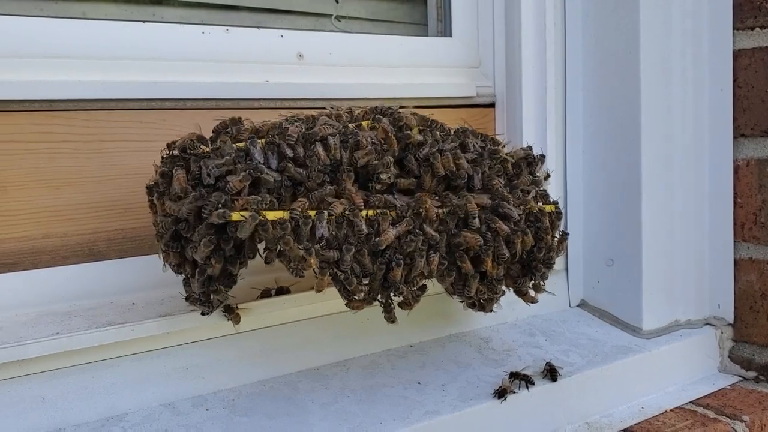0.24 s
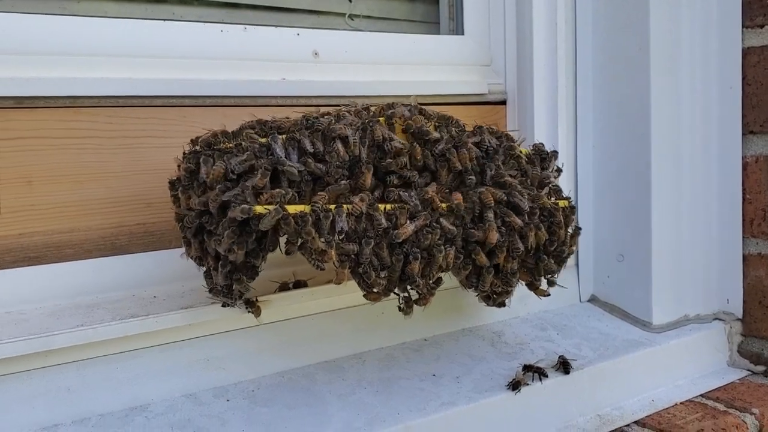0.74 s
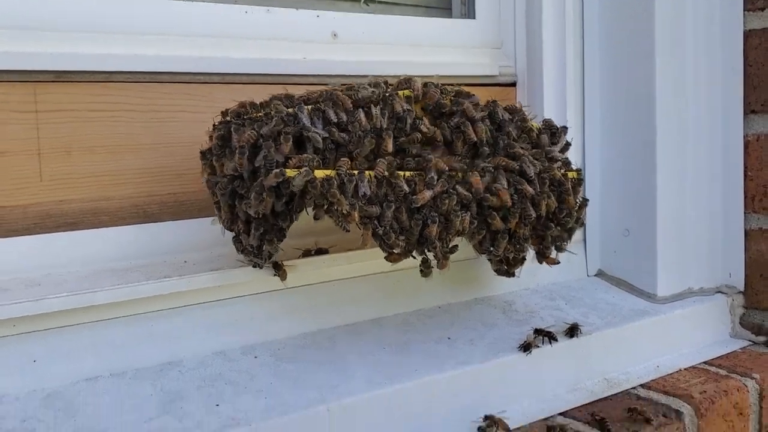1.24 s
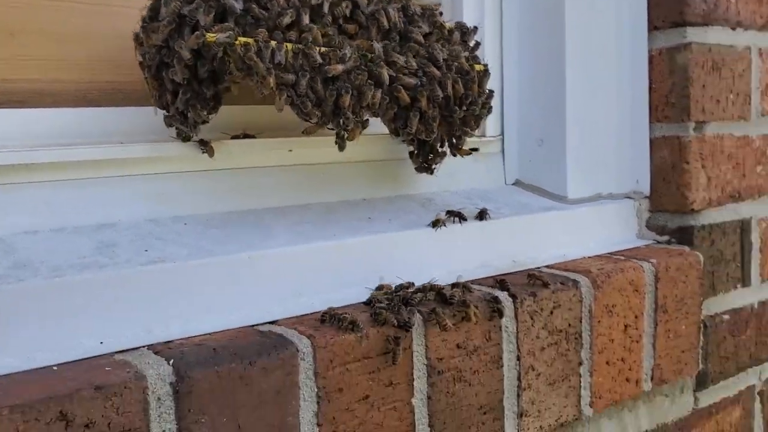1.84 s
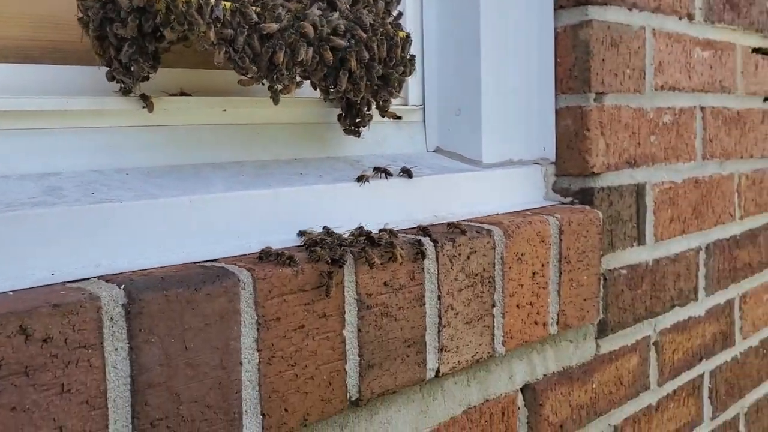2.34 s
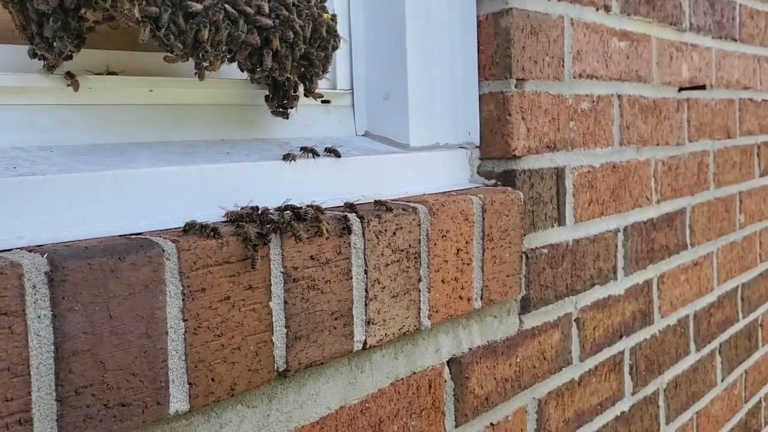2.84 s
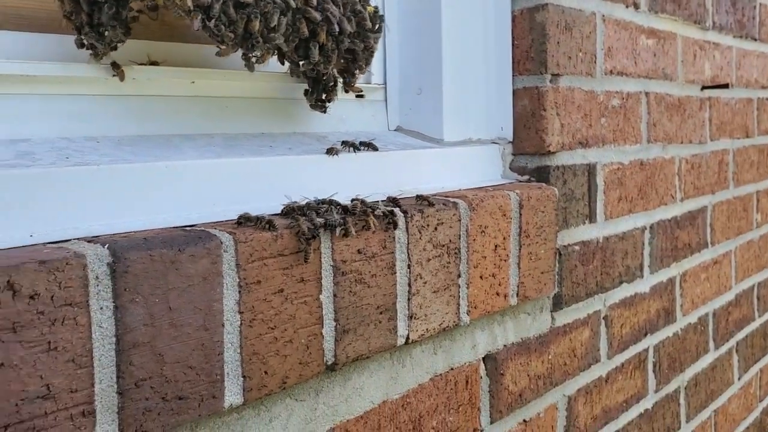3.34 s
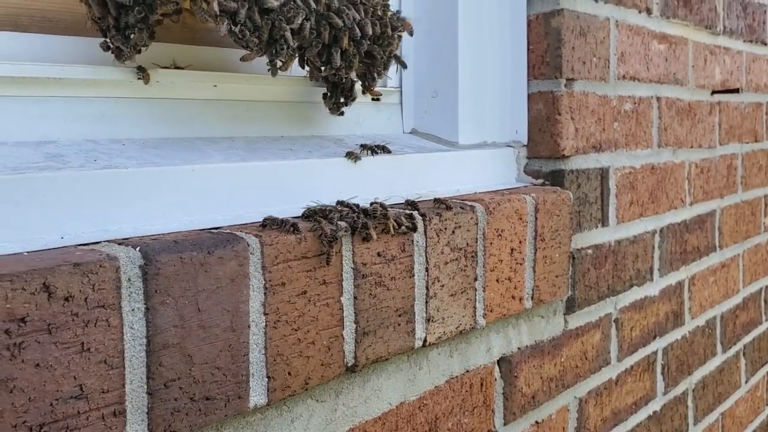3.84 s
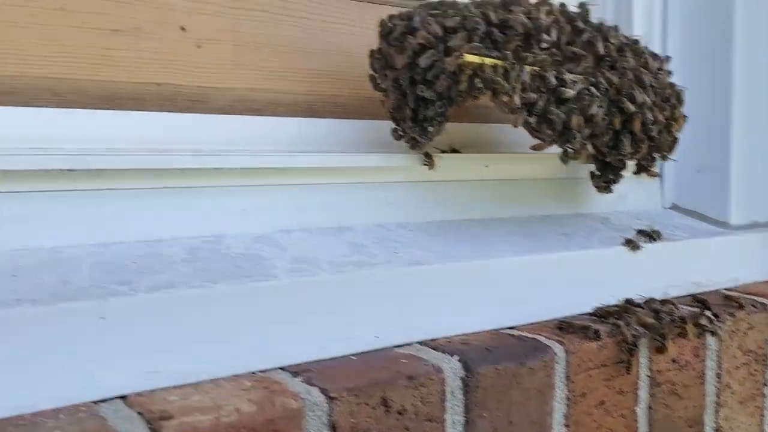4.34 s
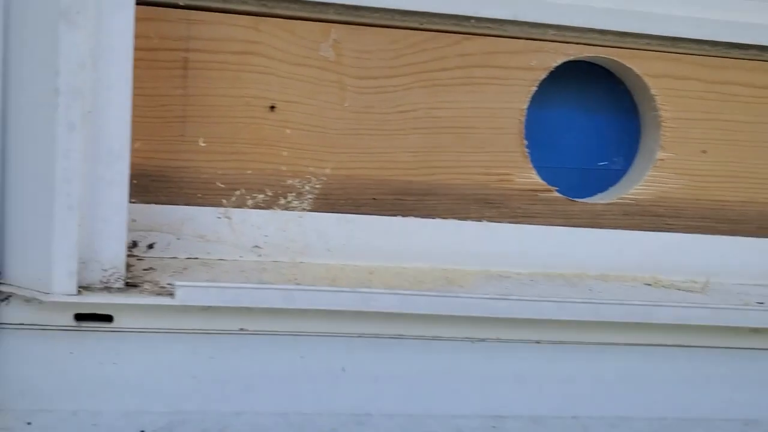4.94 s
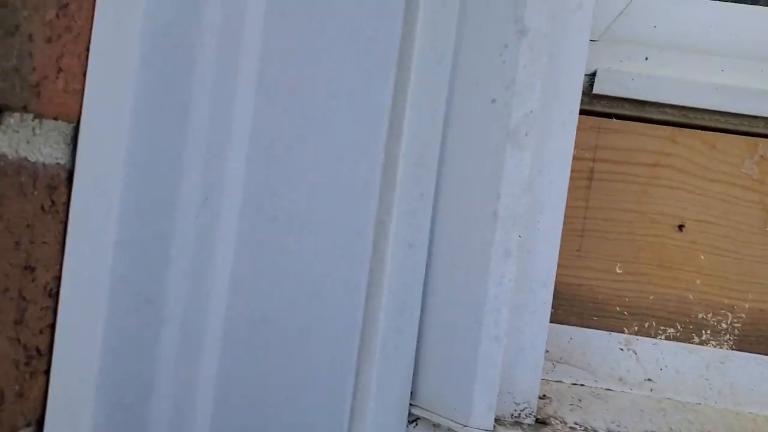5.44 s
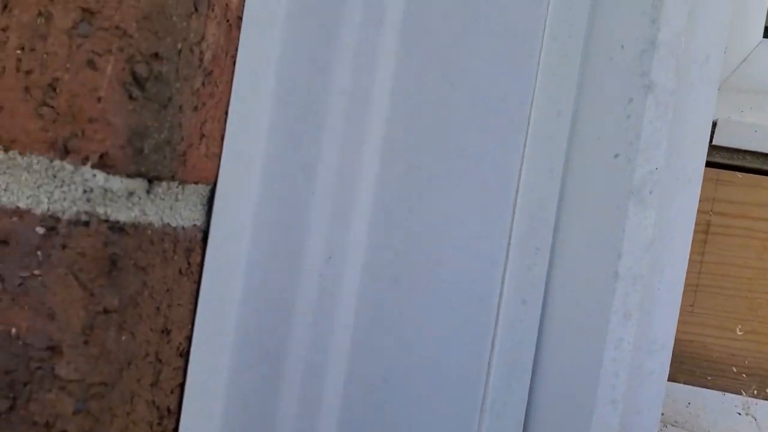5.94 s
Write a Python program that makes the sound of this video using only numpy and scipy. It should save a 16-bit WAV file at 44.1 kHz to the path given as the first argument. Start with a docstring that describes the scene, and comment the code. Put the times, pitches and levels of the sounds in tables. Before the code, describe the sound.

A stereo handheld microphone near a brick house picks up a steady, grainy honeybee hum with wavering overtones. Beneath it, deep far-off machinery beats and rumbles, strongest at first, then dying down. Faint rustles, thin whines and near fly-bys come and go. Later something small is tapped on the left, and near the end shifting feet make one hollow, resonant knock followed by soft scraping.

```python
"""Honeybees at a hive entrance

Honeybees crowd and buzz, as sums of wing-beat harmonics, at a hive on the window of a brick house.
Distant motors hum below as beating sines and exhaust noise; filtered noise makes the outdoor air.
Single bees pass as harmonic clusters, a small bird gives one thin call, and a light tap rings modes.
Towards the end someone shifts their feet: scuffs and one hollow knock ring the ground, and the wall
echoes them."""
import sys
import numpy as np
from scipy import signal
from scipy.fft import rfft, irfft
from scipy.io import wavfile

SR = 44100
rng = np.random.default_rng(int(sys.argv[2]) if len(sys.argv) > 2 else 0)


def wav_record(signal):
    """Record a signal, one row per channel, as 16-bit PCM in the file named by sys.argv[1]."""
    frames = np.transpose(np.atleast_2d(signal))
    bounded = np.clip(frames, -1, 1)
    # unit amplitude maps onto the largest positive 16-bit level
    quanta = np.round(bounded * 32767).astype(np.int16)
    wavfile.write(sys.argv[1], SR, quanta)


N = 272097
TIME = np.arange(N) / SR
HZ = np.maximum(np.arange(N // 2 + 1) * SR / N, 1)


def from_db(db):
    """Decibel law: 20 dB is a factor of ten in amplitude."""
    return 10 ** (np.asarray(db) / 20)


def rms_one(x):
    """Normalisation to unit root mean square."""
    return x / np.sqrt(np.mean(x ** 2) + 1e-20)


def in_time(rows):
    """Linear interpolation of a table's columns at every sample."""
    s, *columns = np.transpose(rows)
    return [np.interp(TIME, s, column) for column in columns]


def on_log_axis(points, at):
    """Interpolation of a two-column table along a logarithmic axis."""
    where, value = np.transpose(points)
    return np.interp(np.log(at), np.log(where), value)


def pan(db):
    """Interaural level difference: left and right gains, positive to the left."""
    return from_db(np.array([[.5], [-.5]]) * db)


def drift(rate):
    """Band-limited random modulation: spread about 1, a new random value rate times a second."""
    knots = rng.standard_normal(N // 8)
    return np.interp(TIME * rate + 1, np.arange(len(knots)), knots) / np.sqrt(2 / 3)


def swell(s, rise, decay):
    """Transient envelope: a Gaussian rise to 1 at time s, then exponential decay."""
    exponent = np.where(TIME < s, ((TIME - s) / rise) ** 2, (TIME - s) / decay)
    return np.exp(-np.minimum(exponent, 50))


def bell(s, length):
    """Gaussian envelope of height 1 around time s."""
    return np.exp(-np.minimum((2 * (TIME - s) / length) ** 2, 50))


def hold_then_fade(hold_s, fade_s):
    """Exponential decay that starts after a steady hold."""
    return np.exp(-np.maximum(TIME - hold_s, 0) / fade_s)


def tone(hz):
    """Phase integration: a sine of rms 1 that follows a pitch curve."""
    return np.sqrt(2) * np.sin(2 * np.pi * (np.cumsum(hz) / SR + rng.random()))


def soften(x, cut_hz):
    """First-order low-pass filtering."""
    return signal.sosfilt(signal.butter(1, min(cut_hz, SR / 2.2), fs=SR, output="sos"), x + 1e-18)


def resonate(x, hz, width_hz):
    """Second-order resonance with a peak gain near 1."""
    r = np.exp(-np.pi * width_hz / SR)
    feed = np.array([1, 0, -1]) * (1 - r * r) / 2
    back = [1, -2 * r * np.cos(2 * np.pi * hz / SR), r * r]
    return signal.lfilter(feed, back, x + 1e-18)


def delayed(x, seconds):
    """Propagation delay: the same sound a moment later."""
    return np.interp(TIME - seconds, TIME, x)


# Likeness of the two ears in diffuse sound: (frequency [Hz], left-right correlation [1])
EAR_LIKENESS = [(25, 0.81), (60, 0.17), (130, 0.7), (290, 0.71), (640, 0.55), (1410, 0), (3100, 0.16),
                (6800, 0), (15000, 0.012)]


def stereo_noise(colour, lean_db=0):
    """Diffuse-field coherence: coloured noise of rms 1, with a given likeness of the ears by frequency."""
    mid, side = rfft(rng.standard_normal((2, N)))
    alike = np.clip(on_log_axis(EAR_LIKENESS, HZ), -1, 1)
    both = np.sqrt(1 + alike) * mid + np.sqrt(1 - alike) * side * [[1], [-1]]
    return rms_one(irfft(both * from_db(on_log_axis(colour, HZ)) * pan(lean_db), N))


# Speed of the deeper motor: (time [s], pitch [Hz])
MOTOR_SPEED = [(0, 64.8), (2.7, 64.93), (3.6, 63.9), (6.17, 61.96)]
# Level of its hum before dips, waver and throb: (time [s], level [dB])
MOTOR_LEVEL = [(0, -22.5), (.65, -24), (1.7, -26.5), (3.25, -35), (3.5, -43), (4.35, -47), (5.2, -41.5),
               (5.8, -37), (6.17, -38)]
# Brief dips of its hum: (time [s], depth [dB], length [s])
MOTOR_DIPS = [(0.254, 6, 0.21), (0.836, 6, 0.093), (1.127, 5, 0.21), (1.409, 12, 0.093), (1.978, 9, 0.074),
              (2.378, 8, 0.039)]
# Throb: rate [1/s], time of one crest [s], share of the amplitude
THROB_PER_S, THROB_CREST_S, THROB_DEPTH = 2.1, 0.027, 0.022


def deep_motor(hz, waver_db=1.27):
    """Amplitude modulation: a far sine throbs evenly, wavers at random and dips briefly."""
    level_db = in_time(MOTOR_LEVEL)[0]
    throb = 1 + THROB_DEPTH * np.cos(2 * np.pi * THROB_PER_S * (TIME - THROB_CREST_S))
    dip_db = sum(db * bell(s, length) for s, db, length in MOTOR_DIPS)
    return from_db(level_db - dip_db + waver_db * drift(26.33)) * throb * tone(hz)


# The microphone's way through the standing wave; whole numbers are nodes:
# (time [s], position [half wavelengths])
MIC_PATH = [(0, 0.076), (.9, 0.45), (1.45, 0.8), (2.05, 1), (2.8, 1.46), (3.45, 1.82), (4.1, 1.99),
            (4.75, 1.98), (5.3, 2.29)]
# Level at a crest [dB], share of the amplitude left at a node
DRONE_DB, DRONE_LEAK = -35, 0.044
DRONE_HZ = 103.7


def standing_drone(wander_hz=0.26):
    """Standing wave: the higher motor fades at the nodes before the wall."""
    standing = np.hypot(np.sin(np.pi * in_time(MIC_PATH)[0]), DRONE_LEAK)
    return from_db(DRONE_DB) * standing * tone(DRONE_HZ + wander_hz * drift(4.48))


# Spectrum of the exhaust noise: (frequency [Hz], relative density [dB per Hz])
EXHAUST_COLOUR = [(10, -34), (25, -15), (45, -4), (65, -6), (90, -3), (125, -1.5), (150, -8.5), (190, -6.5),
                  (230, -24), (300, -86), (600, -64)]
# Fading noise level [dB], its hold [s] and fade [s], and the resting level [dB] added to it
EXHAUST_DB, EXHAUST_HOLD_S, EXHAUST_FADE_S, EXHAUST_REST_DB = -37.5, 0.85, 0.71, -60.5


def exhaust(hz, octave_db=-8.0):
    """Noise and tone superposed: a rumble holds the motor's octave and dies down to a murmur."""
    fading = from_db(EXHAUST_DB) * hold_then_fade(EXHAUST_HOLD_S, EXHAUST_FADE_S)
    load = from_db(EXHAUST_REST_DB) + fading
    return load * (stereo_noise(EXHAUST_COLOUR) + from_db(octave_db) * tone(2 * hz))


# Crest [s], rise [s], decay [s], level [dB], pitch [Hz]
PASSING_S, PASSING_RISE_S, PASSING_DECAY_S, PASSING_DB, PASSING_HZ = 3.26, 1, 0.13, -37.5, 70.2


def passing_hum():
    """Beating: a neighbouring sine swells once close to the deep motor's pitch."""
    envelope = swell(PASSING_S, PASSING_RISE_S, PASSING_DECAY_S)
    return from_db(PASSING_DB) * envelope * tone(np.full(N, PASSING_HZ))


# Faint steady machinery: (mean pitch [Hz], mean level [dB])
HUMS = [(55.6, -47.5), (74.7, -56), (83.0, -51.5), (138.0, -61), (236, -61.5)]


def steady_hums(wander_hz=0.26, waver_db=0.5):
    """Superposition of faint sines that waver slightly in pitch and level."""
    return sum(from_db(db + waver_db * drift(2.6)) * tone(hz + wander_hz * drift(3.7))
               for hz, db in HUMS)


def motors():
    """Superposition: near-sine hums beat against each other above an exhaust rumble."""
    hz = in_time(MOTOR_SPEED)[0]
    hums = deep_motor(hz) + standing_drone() + passing_hum() + steady_hums()
    return (hums + exhaust(hz)) * pan(0.48)


# The colony: (time [s], level [dB], overtone gain against the fundamental [dB])
SWARM = [(0, -51, 12), (.7, -50.5, 11.5), (1.3, -54, 18), (2.0, -54, 12.5), (3.0, -47.5, 6),
         (3.9, -44.5, -6.5), (4.5, -52, 8), (5.3, -46, -1.5), (6.17, -52, 10.5)]
# Harmonics of a wing beat before the overtone gain: (multiple [1], strength [dB])
WING_HARMONICS = [(1, -3.5), (2, 0.5), (3, -8), (4, -14.5), (5, -10.5), (6, -11), (8, -12), (12, -18.5),
                  (18, -38)]
WINGBEAT_HZ = 230.6


def bees(count=16, size=1024, spread=.125, wander=.024, jitter=0.00601,
         nearness_db=4.0, scatter_db=2.0, overtone_pan_db=8.0):
    """Chorus of harmonic sources: each bee's wing rate wanders, its level changing as it moves."""
    multiples = np.arange(1, WING_HARMONICS[-1][0] + 1)
    cycle = np.arange(size) / size
    strengths = from_db(on_log_axis(WING_HARMONICS, multiples))
    level_db, bright_db = in_time(SWARM)
    hum, rasp = np.zeros((2, N)), np.zeros((2, N))
    for offset in np.linspace(-1, 1, count):
        start = rng.random((len(multiples), 1))
        partials = strengths[:, None] * np.sin(2 * np.pi * (np.outer(multiples, cycle) + start))
        hz = WINGBEAT_HZ * (1 + spread * offset + wander * drift(5) + jitter * drift(60))
        beats = np.cumsum(hz) / SR
        # direction, as a share of a beat between the ears
        lag = rng.uniform(-0.00039, 0.00023) * WINGBEAT_HZ
        phase = (np.stack([beats, beats + lag]) % 1 * size).astype(int) % size
        gain = from_db(nearness_db * drift(4)) * pan(scatter_db * rng.standard_normal())
        hum += gain * partials[0][phase]
        # the sharp turn of the wing makes the overtones; the high ones come more from the left
        high = partials[2:].sum(axis=0)[phase] * pan(overtone_pan_db)
        rasp += gain * (partials[1][phase] + high)
    return from_db(level_db) * rms_one(hum + from_db(bright_db) * rasp) * pan(1.0)


# Spectra of the settled wash and the brighter early one: (frequency [Hz], relative density [dB per Hz])
WASH_COLOUR = [(150, -3), (280, 1.5), (380, 2), (600, -1), (720, 1), (1000, -3.5), (1400, -2), (2000, -9.5),
               (2800, -13.5), (4000, -26.5), (6000, -27), (9000, -33)]
EARLY_COLOUR = [(150, -11), (300, -4), (420, 6), (650, -1.5), (1000, 3.5), (1500, 0), (2000, -2.5),
                (2800, -10.5), (4000, -19.5), (9000, -31)]
# The wash reaches the left side more: (frequency [Hz], left minus right [dB])
WASH_LEAN = [(300, 1.5), (700, 2), (1300, 5), (2300, 7.5), (4400, 0)]
WASH_DB = -48.5
# Early wash: level [dB], hold [s], fade [s]
EARLY_DB, EARLY_HOLD_S, EARLY_FADE_S = -47, 1, 0.94


def wash():
    """Diffuse broadband noise: a brighter layer lies over a settled one at first and dies away."""
    lean_db = on_log_axis(WASH_LEAN, HZ)
    early_gain = from_db(EARLY_DB) * hold_then_fade(EARLY_HOLD_S, EARLY_FADE_S)
    settled = from_db(WASH_DB) * stereo_noise(WASH_COLOUR, lean_db)
    early = early_gain * stereo_noise(EARLY_COLOUR, lean_db)
    return from_db(0.5 * drift(16)) * (settled + early)


# Gains of the two sides: (time [s], left gain [dB], right gain [dB])
SIZZLE_GAIN = [(0, -52, -55), (1.0, -52, -62), (1.6, -54, -54.5), (2.2, -52.5, -61), (3.2, -50, -55.5),
               (3.9, -54, -57.5), (4.5, -60, -56.5), (6.17, -73, -56)]
# Spectra of the two sides: (frequency [Hz], relative density [dB per Hz])
SIZZLE_LEFT = [(8500, -33), (10000, -4), (12500, -12), (14300, 4), (15600, 2.5)]
SIZZLE_RIGHT = [(8500, -25), (10800, -3), (12300, 6), (14000, -6), (15600, 6)]


def sizzle():
    """Incoherent high noise at the two ears: its balance shifts between the sides."""
    colours = from_db([on_log_axis(SIZZLE_LEFT, HZ), on_log_axis(SIZZLE_RIGHT, HZ)])
    noise = irfft(rfft(rng.standard_normal((2, N))) * colours, N)
    return from_db(in_time(SIZZLE_GAIN)) * rms_one(noise)


# Spectrum of the fine hiss: (frequency [Hz], relative density [dB per Hz])
HISS_COLOUR = [(2500, 3), (3500, 5), (4500, -1.5), (6500, 2), (8100, -14), (9700, 1), (11000, -15),
               (13000, 0), (15600, 0)]
# (time [s], level [dB])
HISS_LEVEL = [(0, -62), (.6, -56.5), (2.6, -62), (4.5, -56.5), (6.17, -56.5)]


def hiss():
    """High-frequency diffuse noise under a slow level curve."""
    return from_db(in_time(HISS_LEVEL)[0]) * stereo_noise(HISS_COLOUR)


# Spectrum of the far rumble: (frequency [Hz], relative density [dB per Hz])
RUMBLE_COLOUR = [(10, -14), (30, -20), (42, 8), (56, 10), (66, 9.5), (84, 4), (110, 2.5), (150, -11),
                 (220, -6), (400, -35)]
RUMBLE_DB = -42


def rumble():
    """Low-frequency diffuse noise at a constant level."""
    return from_db(RUMBLE_DB) * stereo_noise(RUMBLE_COLOUR)


def outdoors():
    """Superposition of far rumble, broad wash, fine hiss and thin sizzle."""
    return wash() + sizzle() + hiss() + rumble()


# Something brushes the microphone's case: (time [s], level [dB], length [s], left minus right [dB])
BRUSHES = [(0.496, -59.5, 0.16, -2), (0.967, -55.5, 0.23, -9), (5.172, -53.5, 0.016, -5),
           (5.2, -61, .025, -3), (5.297, -51, 0.0072, -2), (5.31, -52.5, 0.031, -3), (5.345, -48, .004, -2),
           (5.385, -55, .005, -2), (5.67, -54, 0.074, -3), (5.943, -53, 0.0068, -3)]
BRUSH_HZ, BRUSH_WIDTH_HZ = 13300, 7000
# Faint chirrs, each in a band of its own:
# (time [s], level [dB], length [s], centre [Hz], width [Hz], left minus right [dB])
CHIRRS = [(0.214, -44, 0.02, 2580, 200, 0), (.212, -59, .022, 4180, 2000, -10),
          (0.98, -55, .2, 2790, 4500, -2), (1.535, -57, 0.037, 3400, 1100, -5),
          (2.447, -56, 0.018, 5570, 1100, 0), (3.26, -49.5, 0.093, 1850, 1090, 5),
          (4.99, -58, 0.12, 3200, 800, -2), (5.167, -53, .012, 5600, 2200, 3)]


def rustles():
    """Band-filtered grainy noise in Gaussian bursts: broad, bright brushes and narrower chirrs."""
    grains = rng.standard_normal((2, N)) * from_db(4.5 * drift(1500))
    bright = rms_one(resonate(grains, BRUSH_HZ, BRUSH_WIDTH_HZ))
    sounds = [(s, db, length, side_db, bright) for s, db, length, side_db in BRUSHES]
    for s, db, length, hz, width, side_db in CHIRRS:
        chirr = rms_one(resonate(resonate(grains, hz, width), hz, width))
        sounds.append((s, db, length, side_db, chirr))
    return sum(from_db(db) * bell(s, length) * sound * pan(side_db)
               for s, db, length, side_db, sound in sounds)


# Single bees that fly closer: (time [s], level [dB], length [s], mean wing beat [Hz],
# brightest overtones [Hz], left minus right [dB])
FLYERS = [(0.447, -67.5, 0.62, 243.5, 2380, 17), (1.36, -68, 0.31, 228, 1820, 2),
          (1.787, -69, 0.3, 241, 1270, 3), (2.555, -61.5, 0.51, 244.8, 1400, 16),
          (3.125, -58, 0.31, 212.4, 1280, 13), (3.647, -73, 0.386, 235, 1450, 15),
          (4.602, -64.5, 0.46, 245, 1400, 18), (5.248, -64.5, .3, 238, 1910, 11)]


def flyers(harmonics=16, size=1024, octaves=0.36, wander=.012, doppler=.015, body_db=-12):
    """Doppler effect: a passing bee sags in pitch, its octave and one overtone cluster standing out."""
    multiples, cycle = np.arange(1, harmonics + 1), np.arange(size) / size
    out = 0
    for s, db, length, beat_hz, bright_hz, side_db in FLYERS:
        cluster = np.exp(-(np.log2(multiples * beat_hz / bright_hz) / octaves) ** 2)
        strengths = cluster + from_db(body_db) * (multiples == 2)
        stroke = rms_one(strengths @ np.sin(2 * np.pi * np.outer(multiples, cycle)))
        hz = beat_hz * (1 + wander * drift(14) - doppler * np.tanh(2 * (TIME - s) / length))
        buzz = stroke[(np.cumsum(hz) / SR * size).astype(int) % size]
        out = out + from_db(db) * bell(s, length) * buzz * pan(side_db)
    return out


# Crest [s], length [s], mean pitch [Hz]
BIRD_S, BIRD_LENGTH_S, BIRD_HZ = 1.185, 0.19, 5085
# Level before trill and flutter [dB], trill rate [1/s], share of the amplitude
BIRD_DB, TRILL_PER_S, TRILL_DEPTH = -66.5, 25, .15


def bird(flutter_db=2.0):
    """Frequency and amplitude modulation: one thin, far, flickering whistle swells and fades softly."""
    trill = 1 + TRILL_DEPTH * np.cos(2 * np.pi * TRILL_PER_S * (TIME - BIRD_S))
    whistle = tone(BIRD_HZ + 38 * drift(400))
    level = from_db(BIRD_DB + flutter_db * drift(57))
    return bell(BIRD_S, BIRD_LENGTH_S) * trill * level * whistle * pan(-2)


# Thin whines out of the crowd: (time [s], level [dB], length [s], pitch [Hz], glide [Hz per s],
# left minus right [dB])
WHINES = [(1.39, -56.5, .19, 1830, 279.5, 4), (1.54, -64, .025, 4170, 0, -5),
          (1.798, -68, .17, 1556, -1, 2), (2.39, -65, 0.1, 1425, -1, 6), (2.946, -52, 0.074, 504, 0, 5),
          (4.61, -72, .14, 3040, 2, 13), (4.705, -60, 0.22, 732, 0, 3), (4.72, -61, 0.24, 437, 0.5, 0),
          (4.946, -70, 0.15, 1570, 249.5, 6), (5.282, -57, 0.37, 435, 3, 4),
          (5.3, -62.5, 0.18, 735, -150, 9)]


def whines(waver_hz=7):
    """Frequency modulation: single thin tones waver, swell, glide a little and fade."""
    out = 0
    for s, db, length, hz, glide, side_db in WHINES:
        pitch = hz + glide * (TIME - s) + waver_hz * drift(90)
        out = out + from_db(db) * bell(s, length) * tone(pitch) * pan(side_db)
    return out


def rubbing(strokes, apart=1.0, rasp_db=2, rasp_width_hz=500):
    """Friction as random excitation: gritty strokes, each with its own rasp, partly unlike at the ears."""
    grit = rng.standard_normal(N) + apart * rng.standard_normal((2, N))
    grit = rms_one(grit * from_db(3 * drift(900)))
    force = 0
    for s, db, rise, decay, cut_hz, rasp_hz in strokes:
        rasping = grit + from_db(rasp_db) * resonate(grit, rasp_hz, rasp_width_hz)
        force = force + from_db(db) * swell(s, rise, decay) * rms_one(soften(rasping, cut_hz))
    return force


def ring(force, modes, pan_db):
    """Modal synthesis: resonances with random path delays; the middle leans left, the top right."""
    # (frequency [Hz], left minus right [dB])
    shade = [(300, -0.5), (1200, pan_db), (2400, 1.2 * pan_db), (5000, -2.5)]
    out = np.zeros((2, N))
    for hz, width, db in modes:
        late = int(rng.uniform(0, .00025) * SR)
        mode = resonate(force, hz, width)[:, :N - late]
        out[:, late:] += from_db(db) * mode * pan(on_log_axis(shade, hz))
    return out


# A light tap that slides on, as force on the body:
# (time [s], level [dB], rise [s], decay [s], brightness cut-off [Hz], rasp [Hz])
TAP_STROKES = [(4.1528, -30, 0.0005, 0.007, 9100, 1850), (4.169, -37, 0.0059, 0.0053, 4000, 3070),
               (4.177, -36, 0.0044, 0.005, 2000, 900), (4.185, -37.5, 0.0038, 0.021, 2200, 1290)]
# Resonances of the tapped body: (frequency [Hz], width [Hz], gain [dB])
TAP_MODES = [(400, 300, -7), (900, 220, -2.5), (1270, 69, 0.5), (1850, 160, -0.5), (2300, 2200, -17),
             (2420, 69, -2), (3090, 50, 3), (3780, 380, -12), (4800, 110, -6), (5750, 170, -5),
             (6050, 170, -6), (6800, 200, -16), (9000, 4800, -25)]


def tap(pan_db=8.0):
    """Forced modal vibration: something small and hard is touched, off to the left."""
    return ring(rubbing(TAP_STROKES), TAP_MODES, pan_db)


# Hard contacts, before a common gain: (time [s], strength [dB], contact cut-off [Hz])
KNOCKS = [(5.6336, -8, 1250), (5.6402, -22, 1300), (5.6446, -23, 2400), (5.6572, -21.5, 1000),
          (5.6637, -24, 4200), (5.6732, -19, 1000), (5.6795, -39, 5000), (5.688, -30, 3800)]
# The knock's short gritty crack, then soles sliding, as force before a common gain:
# (time [s], level [dB], rise [s], decay [s], brightness cut-off [Hz], rasp [Hz])
CRACK_AND_SCUFFS = [(5.635, -25.5, 0.00043, 0.0047, 1400, 1120), (5.661, -29.5, 0.0072, 0.014, 3300, 704),
                    (5.681, -37.5, 0.018, 0.013, 5500, 1740), (5.702, -37.5, 0.0088, 0.0074, 3200, 2100),
                    (5.811, -51, 0.053, 0.018, 1510, 1190), (6.015, -44.5, 0.057, 0.032, 1900, 990),
                    (6.166, -38, 0.022, 0.025, 2000, 1000)]
# Resonances of the ground underfoot: (frequency [Hz], width [Hz], gain [dB])
GROUND_MODES = [(130, 34, 0.5), (220.3, 9.1, 6), (322, 41, -3), (482.7, 5.9, 1.5), (719, 26, 3),
                (897, 18, -4), (1027, 27, -1), (1234, 51, -5.5), (1400, 125, -6.5), (1600, 24, 2.5),
                (1728, 45, -2), (1960, 100, -9), (2090, 57, 2), (2390, 53, -5), (2640, 140, -4.5),
                (2790, 110, -8), (3150, 470, -10), (3560, 170, -4.5), (3860, 160, -15), (4800, 68, -11),
                (5170, 850, -12), (6970, 250, -8)]
# Returns from the wall and the sill: (delay [s], share of the amplitude [1])
ECHOES = [(.0041, .45), (.0107, -.15)]


def feet(knock_db=31, grit_db=7, broad_db=-6.5, pan_db=6.0, left_lag_s=0.00021):
    """Impact, friction and reflection: a knock and scuffs ring the ground, and echoes follow."""
    force = from_db(grit_db) * rubbing(CRACK_AND_SCUFFS)
    for s, db, cut_hz in KNOCKS:
        click = np.zeros(N)
        click[round(s * SR)] = from_db(db + knock_db)
        force += soften(soften(click, cut_hz), cut_hz)
    broad = resonate(resonate(force, 1080, 900), 1050, 980)
    ground = ring(force, GROUND_MODES, pan_db)
    left, right = ground + from_db(broad_db) * broad * pan(pan_db)
    direct = [delayed(left, left_lag_s), right]
    return np.array([ear + sum(share * delayed(ear, s) for s, share in ECHOES) for ear in direct])


def scene():
    """Linear superposition of everything heard in front of the hive."""
    steady = motors() + bees() + outdoors()
    return steady + rustles() + flyers() + bird() + whines() + tap() + feet()


CUTOFF_HZ = 15750


def record(dry):
    """Band limitation: a steep elliptic low-pass cuts the top."""
    return signal.sosfilt(signal.ellip(12, .1, 90, CUTOFF_HZ, fs=SR, output="sos"), dry)


dry = scene()
out = record(dry)
wav_record(out)
```